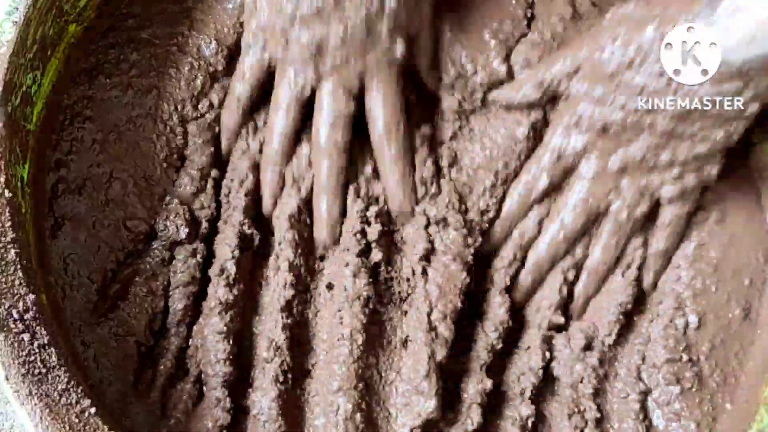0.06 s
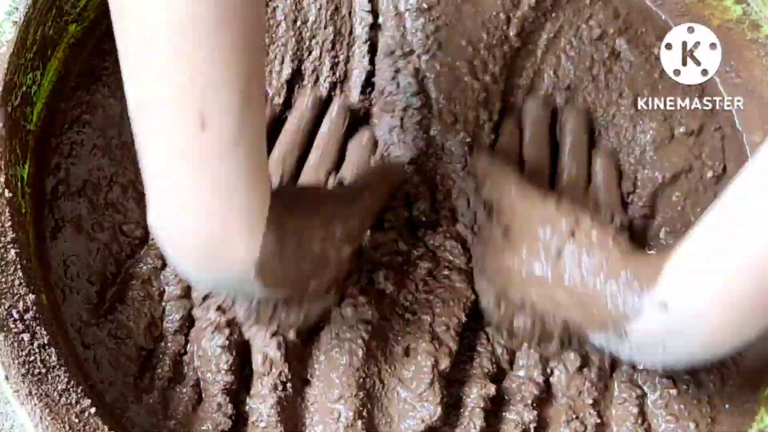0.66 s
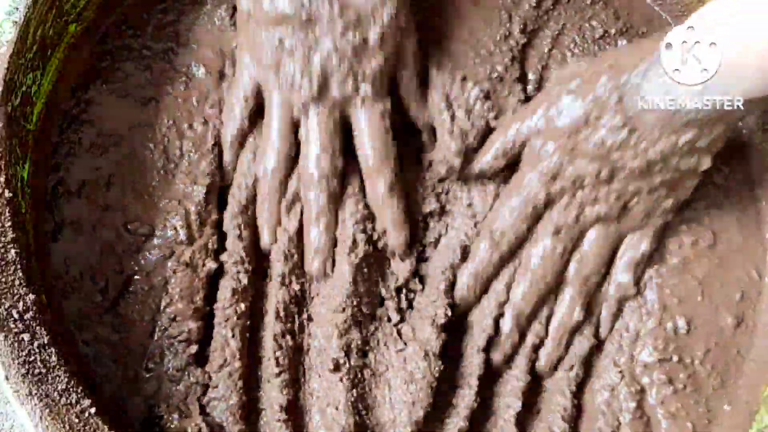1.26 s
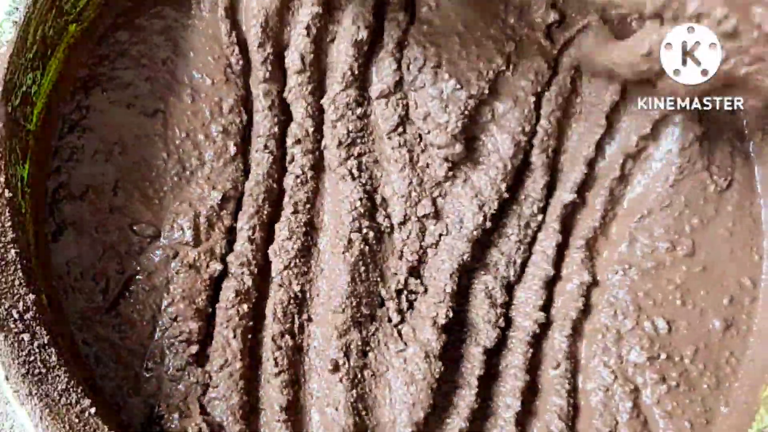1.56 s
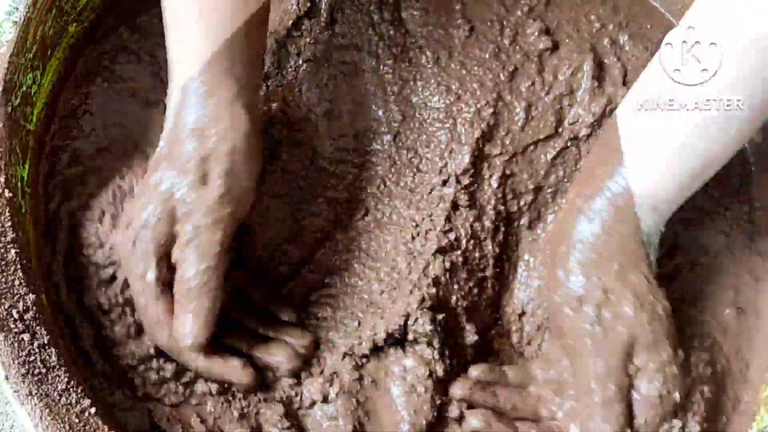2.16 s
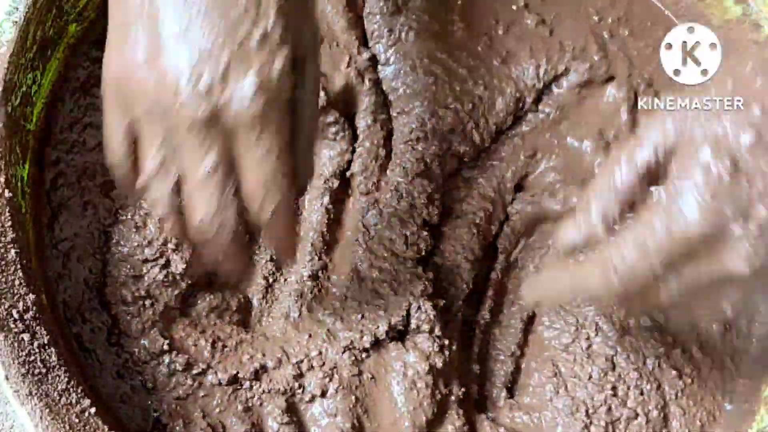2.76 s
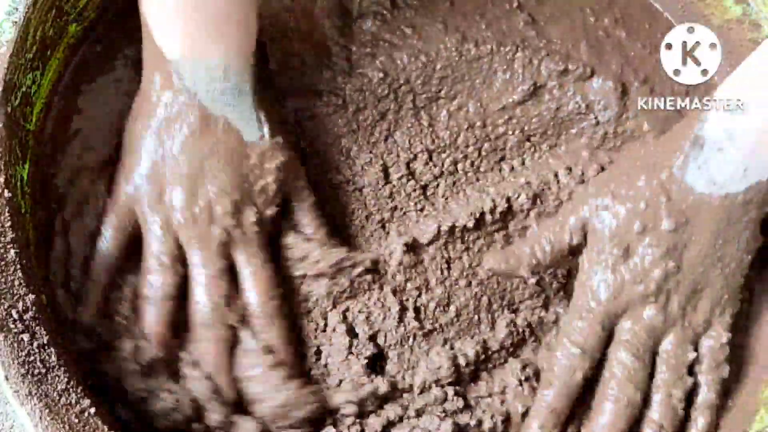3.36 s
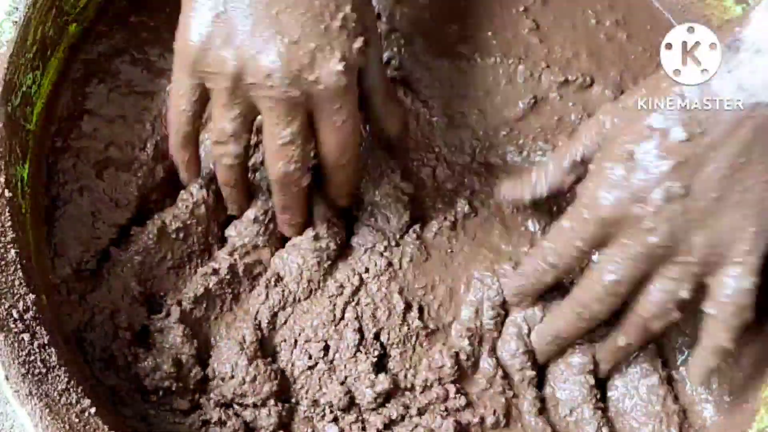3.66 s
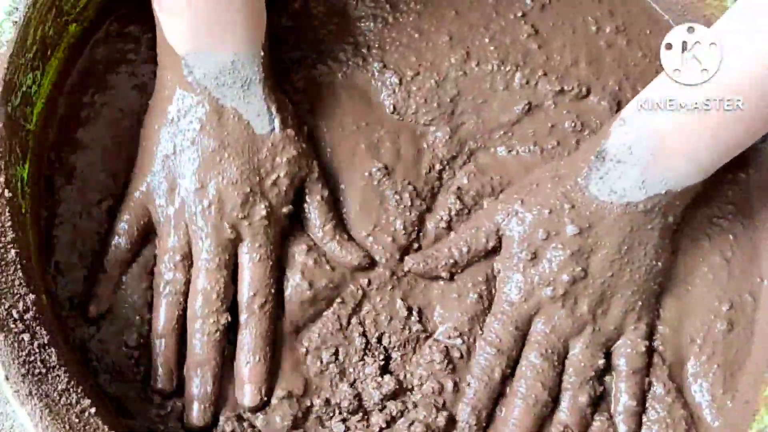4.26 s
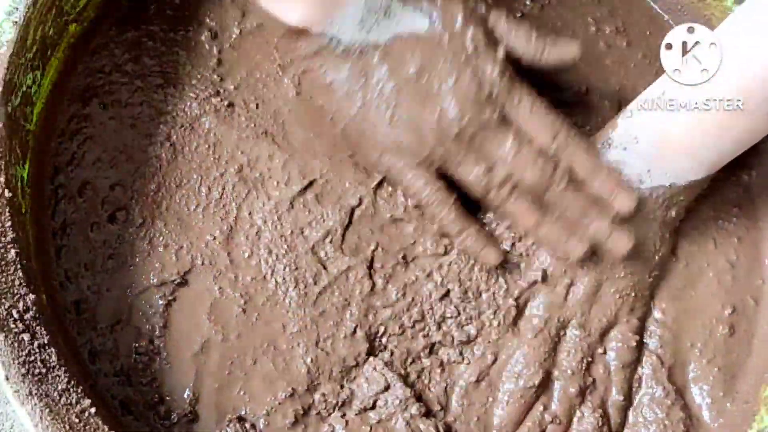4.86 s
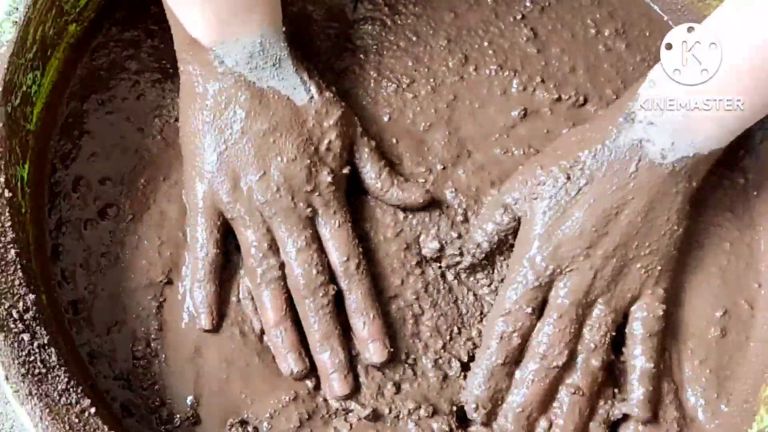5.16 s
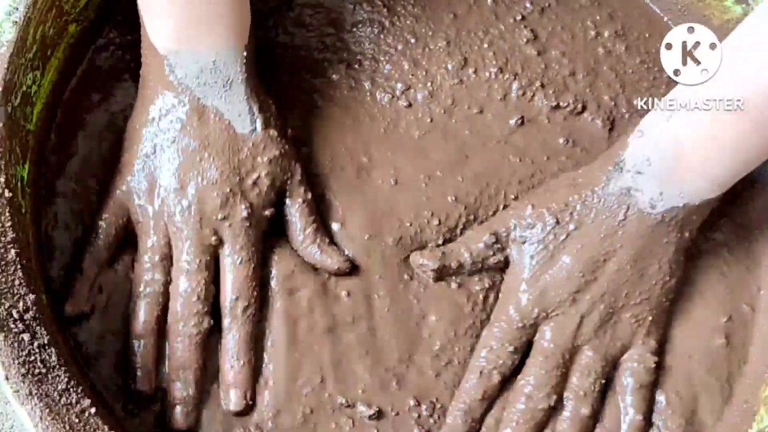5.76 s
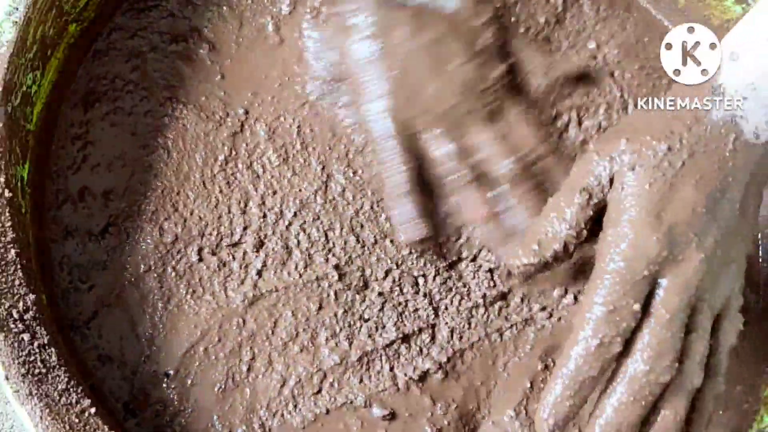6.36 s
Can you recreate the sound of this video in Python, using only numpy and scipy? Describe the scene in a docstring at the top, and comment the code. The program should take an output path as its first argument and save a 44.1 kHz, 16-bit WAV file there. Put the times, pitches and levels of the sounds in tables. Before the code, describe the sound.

Close stereo microphones catch crisp, wet crackling as fingers rake through gritty mud and cement in a bowl. Stroke follows stroke, with splashy slaps, sticky snaps and plops of trapped air between them. After a quieter stretch of patting come brief rasping smears, then a strong slap with a hollow knock from the bowl and a last gritty swipe. A faint low hum and hiss lie underneath in the small room.

```python
"""Wet crackling, squelching and slapping: two hands work dirt and cement slurry in a bowl in a small room.
Dragged grit ticks, tiny wet cavities pop, sticky films snap and slurry rasps between the fingers.
Slaps throw spray, open air pockets that fall in pitch and set the bowl ringing.
A faint hum and hiss lie underneath; the two close microphones each ring in the treble."""
import sys
import numpy as np
from scipy import signal
from scipy.fft import rfft, irfft, next_fast_len
from scipy.io import wavfile
from scipy.ndimage import uniform_filter1d, map_coordinates

SR = 44100
rng = np.random.default_rng(int(sys.argv[2]) if len(sys.argv) > 2 else 0)


def master(y):
    """Save y as 16-bit WAV."""
    cut = np.clip(np.atleast_2d(y).T, -1, 1)
    pcm = np.round(cut * 32767)  # scale
    wavfile.write(sys.argv[1], SR, pcm.astype(np.int16))


N = 282681


def raking():
    """Fingers drag through the paste: sand ticks, wet films snap, coarse grains crack, the mass churns."""
    # Spectra of sand, wet films and the moving mass. Each row: frequency in Hz, level in dB.
    grit_shape = [(500, -66), (2500, -8), (5000, -3), (7500, 1), (9500, -5), (11500, -7.5), (15000, -14.5)]
    squelch_shape = [(300, -51), (1000, -13.5), (2000, -3), (3500, -2), (5500, -3.5), (9000, -8.5),
                     (15000, -45)]
    churn_shape = [(80, -22), (220, -11), (380, -1.5), (520, -5), (1000, 0.5), (1500, -1.5), (3000, -3),
                   (8000, -61)]
    grit_db, squelch_db, churn_db = stroke_levels_db()
    slip_db = wobble(35) + 0.48 * wobble(170)  # the paste gives way in clumps
    sand = amp(grit_db - 6.5 + 1.2 * wobble(90))
    sand = sand * patter(grit_shape, per_s=22000, scatter_db=3.5, spread_s=0.00012)
    coarse = amp(grit_db - 13) * patter(grit_shape, per_s=200, scatter_db=-1.2)
    fizz = amp(grit_db - 18) * bubbles(per_s=420, centre_hz=7363, octaves=0.767, scatter_db=5, cycles=24)
    films = amp(squelch_db - 1.5) * patter(squelch_shape, per_s=8000, scatter_db=0.5)
    crackle = bubbles(per_s=370, centre_hz=3473, octaves=1.496, scatter_db=9.5, cycles=8)
    crackle *= amp(squelch_db - 14)
    ticks = amp(squelch_db - 9) * patter(squelch_shape, per_s=200, scatter_db=-0.5)
    mass = amp(churn_db + 2) * patter(churn_shape, per_s=6500, scatter_db=3.5, spread_s=0.00017)
    pops = bubbles(per_s=260, centre_hz=1336, octaves=1.93, scatter_db=16, cycles=4.4)
    pops *= amp(churn_db - 10)
    paste = sand + coarse + fizz + films + crackle + ticks + mass + pops
    return finger_gaps(amp(slip_db) * paste, depth_db=2)


def stroke_levels_db(waver_db=0.5, waver_per_s=20):
    """Grit, squelch and churn levels: each stroke builds, holds and slows, under uneven pressure."""
    # Hand strokes. Each row: start, rise, hold and slowing in seconds; grit, squelch and churn in dB.
    strokes = [(0.0, 0.005, 0.19, 0.29, -21, -26, -33), (0.05, 0.073, 0.01, 0.076, -18.5, -29, -54),
               (0.567, 0.25, 0.13, 0.18, -21.5, -32, -36.5), (0.95, 0.035, 0.021, 0.3, -23.5, -26.5, -29.5),
               (1.138, 0.061, 0.16, 0.57, -21.5, -27.5, -35), (1.81, 0.068, 0.24, 0.14, -24, -30.5, -41),
               (2.122, 0.11, 0.067, 0.092, -24.5, -33.5, -38.5),
               (2.263, 0.18, 0.018, 0.19, -24, -32.5, -34), (2.401, 0.069, 0.19, 0.29, -29.5, -30.5, -37),
               (2.943, 0.038, 0.03, 0.13, -28, -31, -29), (2.97, 0.18, 0.016, 0.18, -18.5, -23, -29.5),
               (3.224, 0.18, 0.047, 0.2, -17.5, -24.5, -32), (3.522, 0.05, 0.025, 0.32, -24.5, -33, -36.5),
               (3.685, 0.038, .01, 0.17, -25.5, -35, -50), (3.942, 0.02, 0.44, 0.95, -39, -43, -50.5),
               (4.505, 0.15, 0.013, 0.093, -22, -30.5, -46), (4.732, 0.1, 0.0065, 0.053, -18.5, -28.5, -43),
               (4.875, 0.028, .005, 0.15, -22, -30, -51), (5.016, 0.055, 0.022, 0.15, -19.5, -30, -40),
               (5.162, 0.096, 0.066, 0.36, -32, -35, -51), (5.538, 0.015, 0.031, 0.25, -38, -26, -40),
               (5.657, 0.026, 0.51, 0.24, -32.5, -41, -48), (6.13, 0.15, 0.051, 0.15, -22.5, -31.5, -40.5)]
    t = np.arange(N) / SR
    power = np.zeros((3, N))
    for start_s, rise_s, hold_s, slowing_s, *levels_db in strokes:
        push = np.sin(np.pi / 2 * np.clip((t - start_s) / rise_s, 0, 1))
        speed = 1 - np.clip((t - start_s - rise_s - hold_s) / slowing_s, 0, 1)
        power += np.outer(amp(levels_db), push * speed ** 2) ** 2
    return 10 * np.log10(power + 1e-12) + waver_db * wobble(waver_per_s)


def finger_gaps(x, depth_db):
    """Gaps between the fingers open and close, so broad patches of the spectrum come and go."""
    spectrum = signal.stft(x, nperseg=512)[2]
    patches = uniform_filter1d(rng.standard_normal(spectrum.shape[1:]), size=6, axis=0)
    patches = uniform_filter1d(patches, size=10, axis=1)
    return signal.istft(spectrum * amp(depth_db * unit(patches)), nperseg=512)[1][:, :N]


def bubbles(per_s, centre_hz, octaves, scatter_db, cycles):
    """Small pockets open at random in the stirred paste."""
    track = np.zeros((2, N))
    for when, pitch, size, side in rng.random((int(per_s * N / SR), 4)):
        hz = centre_hz * 2 ** (octaves * (pitch - 0.5))
        pan = np.sqrt([[1 - side], [side]])
        add(track, when * N / SR, pan * amp(scatter_db * size ** 2) * pocket(cycles / hz, hz, 0.875 * hz))
    return unit(track)


def slaps():
    """A landing hand throws spray, squirts water sideways and thumps the mass, which then flows back."""
    # Hand landings. Each row: start and contact time in seconds; spray, squirt and thud in dB.
    landings = [(0.5595, 0.0073, -17, -20.5, -20.5), (0.589, 0.012, -19.5, -34, -25.5),
                (1.183, 0.029, -23, -35, -52), (1.791, 0.0072, -25.5, -32, -44),
                (1.801, 0.0036, -16, -20, -22.5), (1.823, 0.0064, -18, -20, -21),
                (2.95, 0.037, -19, -41, -16), (3.902, 0.035, -22.5, -27.5, -32),
                (3.955, 0.014, -24.5, -29, -33), (4.012, 0.003, -44, -40, -31),
                (4.044, 0.019, -30, -36, -45), (4.182, 0.027, -31.5, -41, -38),
                (4.339, 0.015, -28.5, -45, -39), (4.938, 0.015, -23.5, -31, -36.5),
                (5.214, 0.0053, -25, -24, -21), (5.379, 0.012, -28.5, -37, -29),
                (5.5385, 0.012, -16.5, -9.5, -17), (5.704, 0.0038, -21, -28, -26.5),
                (5.84, .004, -26, -32, -26.5), (5.858, 0.0052, -19.5, -48, -37),
                (6.005, 0.005, -28, -41, -29), (6.116, 0.0064, -28.5, -42, -30)]
    # Spectra of droplets, expelled water and struck slurry. Each row: frequency in Hz, level in dB.
    spray_shape = [(300, -19), (1200, -29), (3000, -1.5), (6000, 9), (9000, 5.5), (15000, -11)]
    squirt_shape = [(400, -42), (1300, -15), (2300, 2), (3500, -2), (5000, -5), (8000, -13.5), (15000, -18)]
    thud_shape = [(100, -41), (220, -16), (350, 3), (500, -13), (800, -4.5), (1200, -5), (2200, -7.5),
                  (4000, -20), (12000, -41)]
    touch_s, touch_db = 0.0072, -2.5  # fingertips land earlier and softer than the palm
    settle_t60_s, settle_db = 0.33, -11.5
    spray_level, squirt_level, thud_level = np.zeros((3, N))
    t = np.arange(SR // 4) / SR - touch_s
    landed_s = np.maximum(t, 0)
    touch = amp(touch_db) * np.clip(1 + t / touch_s, 0, 1) * (t < 0)
    for start_s, contact_s, spray_db, squirt_db, thud_db in landings:
        after_s = np.maximum(t - contact_s, 0)
        release = np.maximum(amp(-60 * after_s / 0.019), amp(settle_db - 60 * after_s / settle_t60_s))
        contact = (1 - np.exp(-landed_s / 0.00074)) * release
        thump = (1 - np.exp(-landed_s / 0.0036)) * amp(-60 * after_s / 0.049)
        add(spray_level, start_s - touch_s, amp(spray_db) * (touch + contact))
        add(squirt_level, start_s - touch_s, amp(squirt_db) * contact)
        add(thud_level, start_s - touch_s, amp(thud_db) * thump)
    spray = spray_level * patter(spray_shape, per_s=12000, scatter_db=-2, spread_s=0.00007)
    squirt = squirt_level * patter(squirt_shape, per_s=5500, scatter_db=-2, spread_s=0.00007)
    thud = thud_level * patter(thud_shape, per_s=7300, scatter_db=3, spread_s=0.0002)
    return amp(-1) * (spray + squirt + thud)


def snaps():
    """A stretched film lets go with one sharp click; the smaller the film, the higher its pitch."""
    # Sticky films between skin and paste. Each row: start in seconds, pitch in Hz, level in dB.
    films = [(0.0248, 8490, -17), (0.147, 7000, -11), (0.262, 8500, -15), (0.5565, 6530, -11),
             (0.5606, 4700, 1.5), (0.566, 6300, -3.5), (0.5663, 2920, -8), (.5917, 7600, -12),
             (0.599, 8260, -6), (.6132, 7600, -9), (1.8034, 5900, -3), (1.804, 8340, -11),
             (1.8237, 9000, -1.5), (1.824, 5160, -1), (1.8268, 7200, -3), (1.8305, 3920, -2),
             (3.15, 7550, -11), (3.172, 8150, -7), (3.449, 7900, -7), (3.7234, 7300, -12),
             (3.796, 2300, -17.5), (3.913, 7500, -9), (3.917, 4570, -11), (3.9575, 7000, -17),
             (3.9645, 6350, -14), (3.9698, 4470, -7), (4.0135, 1500, -18), (5.2166, 3430, -2.5),
             (5.2164, 7900, -9), (5.680, 3100, -8), (5.7073, 7600, -7), (5.8406, 7960, -7.5),
             (6.0057, 5280, -9.5), (6.244, 4700, -7)]
    track = np.zeros((2, N))
    t = np.arange(SR // 50) / SR
    for start_s, hz, db in films:
        wander_rad = 0.29 * np.cumsum(rng.standard_normal((2, len(t))), axis=1)  # broadens the ring
        envelope = amp(db - 60 * t / 0.009) * (1 - np.exp(-t / 0.00025))
        click = np.diff(envelope * np.sin(2 * np.pi * hz * t + wander_rad), prepend=0)
        add(track, start_s, click / (2 * np.sin(np.pi * hz / SR)))
    return track


def plops(tear_db=1.8, tear_cycles=1.37):
    """Larger air pockets open under the hands; their gritty walls tear unevenly and roughen the note."""
    # Trapped air. Each row: start and glide time in seconds, first and last pitch in Hz, level in dB.
    pockets = [(0.564, 0.01, 1225, 403, -23), (0.596, .004, 1600, 1200, -20),
               (0.998, 0.0065, 1220, 740, -15), (1.103, 0.0083, 2670, 2150, -17.5),
               (1.8021, 0.0025, 6200, 4900, -2), (1.804, 0.0088, 1500, 404, -18.5),
               (1.828, 0.007, 5220, 2630, -11), (1.83, 0.0058, 2400, 700, -30),
               (2.953, 0.011, 1425, 747, -8), (2.953, 0.01, 540, 394, -11.5),
               (2.978, 0.0089, 1370, 743, -7), (2.998, 0.0094, 1150, 760, -19),
               (3.9265, 0.0049, 1710, 700, -18), (3.931, 0.0053, 575, 380, -17),
               (4.0115, 0.0048, 2320, 1910, -13.5), (4.024, 0.011, 745, 530, -23.5),
               (5.2185, 0.007, 940, 407, -11), (5.54, 0.0039, 2185, 785, 0),
               (5.5425, 0.0098, 920, 734, -2.5), (5.5505, 0.0045, 653, 320, -6.5),
               (5.564, 0.013, 377, 347, -12), (5.703, 0.0098, 382, 288, -24),
               (5.855, 0.0099, 332, 280, -19)]
    track = np.zeros(N)
    for start_s, glide_s, first_hz, last_hz, db in pockets:
        note = pocket(glide_s, first_hz, last_hz)
        cycles = np.arange(len(note)) / SR * np.sqrt(first_hz * last_hz)
        tear = map_coordinates(rng.standard_normal(64), [cycles / tear_cycles], mode="wrap")
        add(track, start_s, amp(db + tear_db * tear) * note)
    return track


def pocket(glide_s, first_hz, last_hz):
    """An air pocket rings briefly, its pitch sinking as it widens."""
    progress = np.arange(int(2 * glide_s * SR)) / (glide_s * SR)
    hz = first_hz * (last_hz / first_hz) ** np.minimum(progress, 1)
    swell = (1 - np.exp(-progress / 0.31)) ** 2 * np.exp(-(progress / 0.84) ** 4)
    return swell * np.sin(2 * np.pi * np.cumsum(hz) / SR)


def rasps(width_hz=550):
    """Grit forced between fingers sounds in one resonance that slides as the gap changes."""
    # Squeezes. Each row: start and length in seconds, first and last pitch in Hz, level in dB.
    squeezes = [(2.062, 0.14, 2990, 2180, -34.5), (2.302, .22, 1595, 1353, -36),
                (2.36, 0.082, 7050, 5800, -46), (2.591, 0.082, 1850, 2430, -32),
                (2.945, 0.056, 1243, 1107, -19.5), (3.112, 0.11, 7060, 7320, -28.5),
                (3.281, 0.068, 6440, 6600, -32), (3.343, 0.075, 5350, 5100, -23.5),
                (4.66, .12, 3500, 4320, -40), (4.78, 0.043, 5340, 4970, -40),
                (4.924, 0.047, 4450, 4620, -29), (5.04, 0.087, 5900, 5730, -46),
                (5.206, 0.034, 3570, 3200, -30), (5.285, 0.26, 3450, 3210, -49),
                (5.98, 0.085, 5340, 5000, -41), (6.112, 0.046, 2425, 2280, -38)]
    track = np.zeros((2, N))
    clicks = grains(per_s=2900, scatter_db=1, spread_s=0.0004)
    flow = unit(filtered(clicks, lambda hz: 1 / (1 + (hz / width_hz) ** 2) ** 2))
    for start_s, length_s, first_hz, last_hz, db in squeezes:
        progress = np.arange(int(length_s * SR)) / (length_s * SR)
        phase = 2 * np.pi * np.cumsum(first_hz * (last_hz / first_hz) ** progress) / SR
        band = np.sqrt(2) * np.sin(phase) * flow[:, round(start_s * SR):][:, :len(progress)]
        add(track, start_s, amp(db) * np.sin(np.pi * progress) * band)
    return track


def knocks():
    """One impulse for each palm that reaches the bottom of the bowl."""
    # Palm impacts. Each row: time in seconds, level in dB.
    impacts = [(5.548, 8), (5.859, -15)]
    track = np.zeros((2, N))
    for time_s, db in impacts:
        track[:, round(time_s * SR)] = amp(db)
    return track


def bowl(x):
    """The half-filled bowl rings hollowly after each blow."""
    # Bowl modes. Each row: frequency in Hz, T60 in seconds, level in dB.
    modes = [(217, 0.98, -11.5), (359.4, 0.44, -15), (636, 0.2, -11), (777, 0.26, -22), (890, 0.25, -10),
             (991, 0.2, -15), (1210, 0.15, -16)]
    t = np.arange(SR // 2) / SR
    ring = sum(amp(db) * unit(amp(-60 * t / t60_s) * np.sin(2 * np.pi * hz * t))
               for hz, t60_s, db in modes)
    return signal.fftconvolve(x, ring[None] / np.sqrt(len(t)), axes=1)[:, :N]


def room(x, delay_s=0.005):
    """The walls return a short tail that dies sooner in the treble."""
    # Room decay. Each row: frequency in Hz, T60 in seconds.
    decay = [(150, 0.6), (800, 0.37), (3000, 0.25), (9000, 0.16), (15000, 0.086)]
    hz, t, spectrum = signal.stft(rng.standard_normal((2, SR // 2)), SR, nperseg=256)
    tail = signal.istft(spectrum * amp(-60 * t / along(decay, hz)[:, None]), SR, nperseg=256)[1]
    tail = np.pad(tail, ((0, 0), (int(delay_s * SR), 0)))
    return signal.fftconvolve(x, tail / np.linalg.norm(tail[0]), axes=1)[:, :N]


def hiss():
    """Steady noise, alike on both sides only in the low middle."""
    # Hiss spectrum. Each row: frequency in Hz, level in dB.
    hiss_shape = [(20, 7), (50, -5.5), (110, -6.5), (190, -1.5), (300, -1.5), (550, -11), (1400, -21.5),
                  (4000, -16), (7000, -16.5), (9000, -7), (10600, -8.5), (11400, -41), (15000, -31)]
    side_shape = [(40, 1), (160, -7), (300, -9), (500, -7), (2000, 0.5)]
    mid, side = rng.standard_normal((2, N))
    side = filtered(side, lambda hz: amp(along(side_shape, hz)))
    return unit(filtered(np.array([mid + side, mid - side]), lambda hz: amp(along(hiss_shape, hz))))


def hum():
    """Narrow bands of noise make a low, wavering hum."""
    # Hum bands. Each row: centre and width in Hz, level in dB.
    bands = [(144.17, 7.9, -45), (156.2, 17.4, -47.5), (212.4, 11, -51.5), (361, 24, -61.5)]
    track = np.zeros(N)
    for centre_hz, width_hz, db in bands:
        noise = rng.standard_normal(N)
        band = filtered(noise, lambda hz: 1 / (1 + (2 * (hz - centre_hz) / width_hz) ** 2) ** 2)
        track += amp(db) * unit(band)
    return track


def grains(per_s, scatter_db, spread_s):
    """Tiny random clicks from all over the bowl; each reaches the two microphones at its own moments."""
    size, offset = rng.standard_normal((int(per_s * N / SR), 2)).T
    left = rng.integers(0, N, len(size))
    right = (left + np.round(offset * spread_s * SR).astype(int)) % N
    size = np.sign(size) * amp(scatter_db * np.minimum(rng.standard_normal(len(size)), 2))
    return unit(np.array([np.bincount(left, size, N), np.bincount(right, size, N)]))


def patter(shape, per_s, scatter_db, spread_s=0.00009):
    """Grains with a (Hz, dB) spectrum, at rms 1."""
    return unit(colour(grains(per_s, scatter_db, spread_s), shape))


def amp(db):
    """Decibels to gain."""
    return 10 ** (np.asarray(db) / 20)


def unit(x):
    """Scale to rms 1."""
    return x / np.sqrt(np.mean(x ** 2) + 1e-20)


def along(points, hz):
    """Read (Hz, value) points on a log axis."""
    points_hz, values = np.transpose(points)
    return np.interp(np.log(hz + 1), np.log(points_hz + 1), values)


def wobble(knots_per_s):
    """Smooth random curve."""
    knots = rng.standard_normal(int(N * knots_per_s / SR) + 4)
    return map_coordinates(knots, [np.arange(N) * knots_per_s / SR])


def filtered(x, response):
    """Zero-phase filter; response maps Hz to gain."""
    size = next_fast_len(N + SR // 2)
    return irfft(rfft(x, size) * response(np.fft.rfftfreq(size, 1 / SR)), size)[..., :N]


def colour(x, shape, size=2048):
    """Minimum-phase filter with a (Hz, dB) shape."""
    cepstrum = irfft(np.log(amp(along(shape, np.fft.rfftfreq(size, 1 / SR)))))
    cepstrum[1:size // 2] *= 2
    cepstrum[size // 2 + 1:] = 0
    return signal.oaconvolve(x, irfft(np.exp(rfft(cepstrum)))[None], axes=1)[:, :N]


def add(track, start_s, sound):
    """Mix a sound into a track."""
    part = track[..., round(start_s * SR):][..., :sound.shape[-1]]
    part += sound[..., :part.shape[-1]]


def scene():
    """Hands in the bowl, the room around them, hiss and hum."""
    blows = slaps() + snaps() + plops()
    hands = raking() + rasps() + blows + bowl(amp(-25) * blows.mean(axis=0) + knocks())
    return hands + amp(-8.5) * room(hands) + amp(-34) * hiss() + hum()


def record(dry, top_hz=15450):
    """Each microphone port rings in the treble; peaks clip at full scale, then the band is limited."""
    # Microphone responses. Each row: frequency in Hz, gain in dB.
    left_mic = [(100, 3.5), (250, 3), (400, 0.5), (1200, 1.16), (2500, -1), (6100, -0.5), (7300, 4),
                (8700, 13.5), (9150, 12.5), (9650, 0.5), (9950, 8), (10400, -8), (10650, 3.5),
                (11000, -1.5), (15000, 0)]
    right_mic = [(100, -1), (400, -3.5), (1200, -0.5), (2500, -1), (6000, 1.5), (7100, 9), (7700, 9.5),
                 (8750, 7.5), (9650, 4), (9950, 3), (10400, -10.5), (10650, 2), (11000, -3), (15000, -0.5)]
    heard = np.concatenate([colour(dry[:1], left_mic), colour(dry[1:], right_mic)])
    return filtered(np.clip(heard, -1, 1), lambda hz: hz < top_hz)


dry = scene()
out = record(dry)
master(out)
```